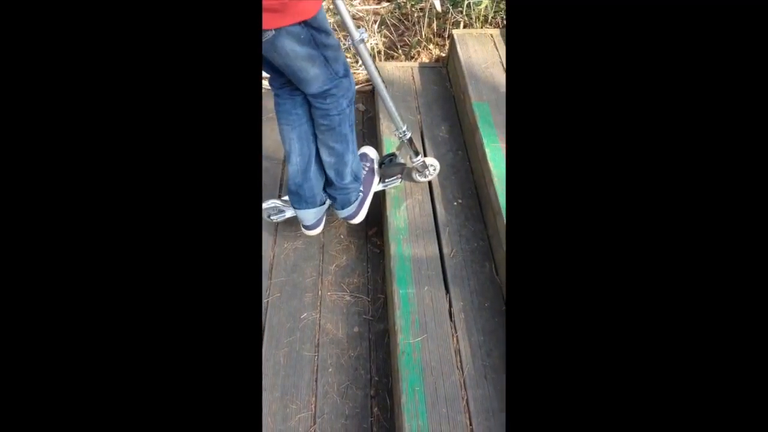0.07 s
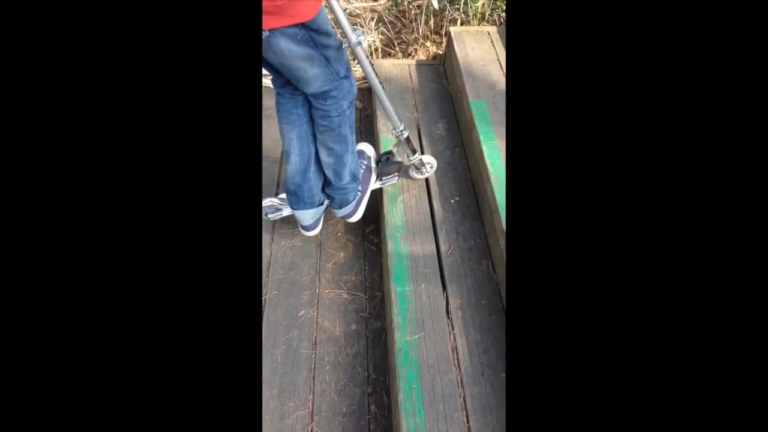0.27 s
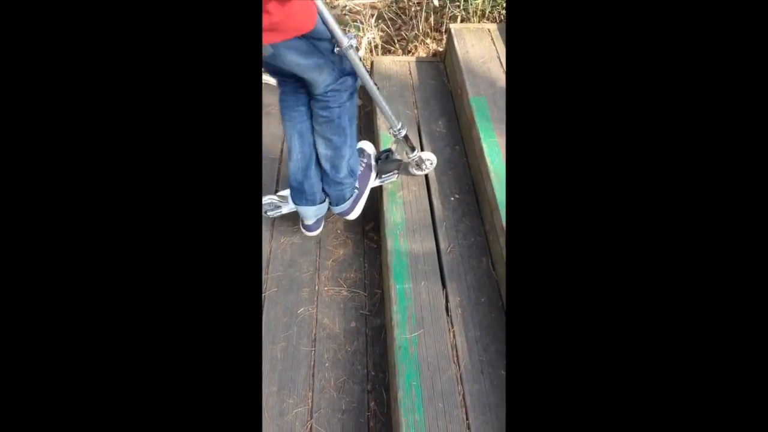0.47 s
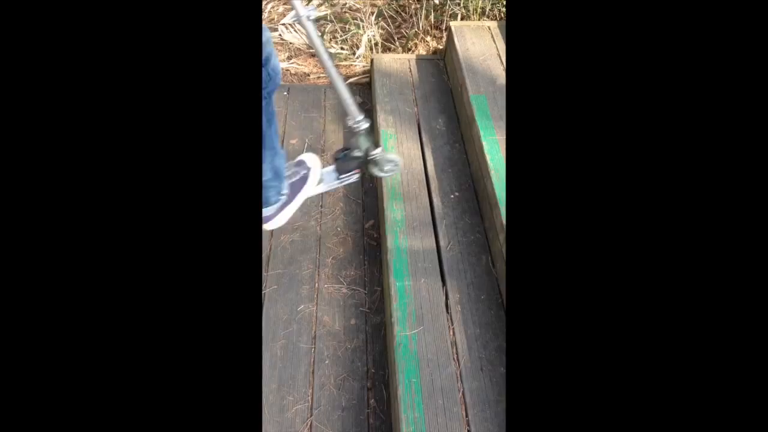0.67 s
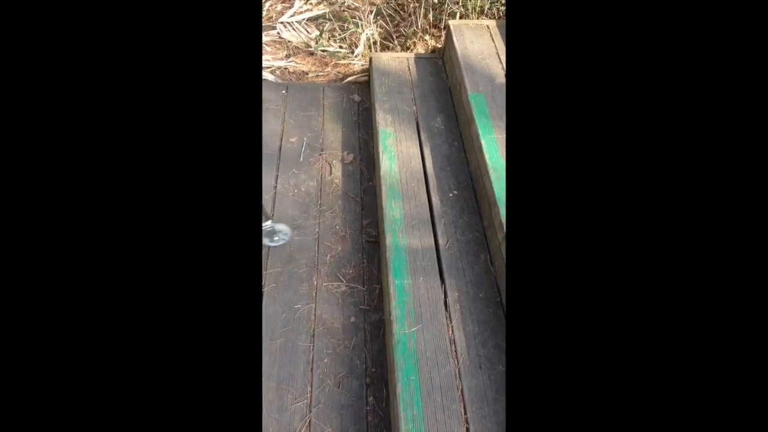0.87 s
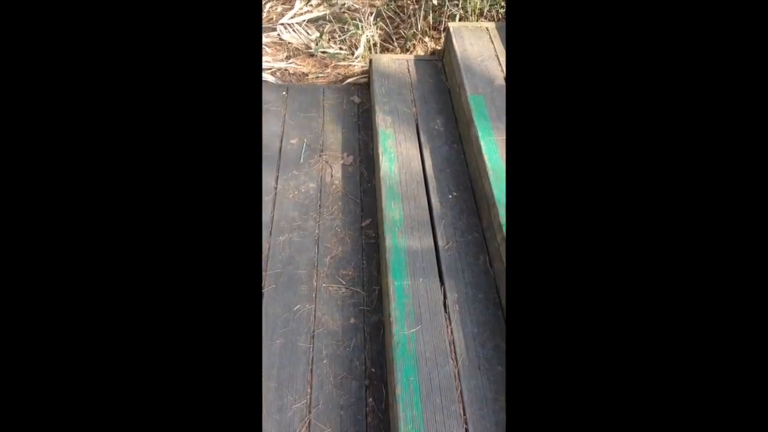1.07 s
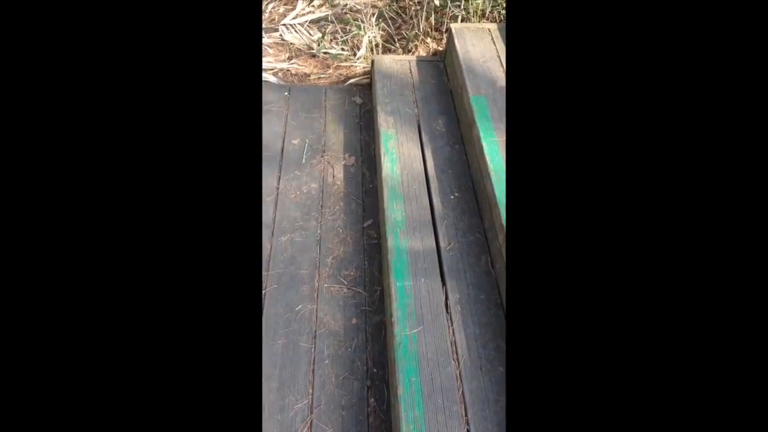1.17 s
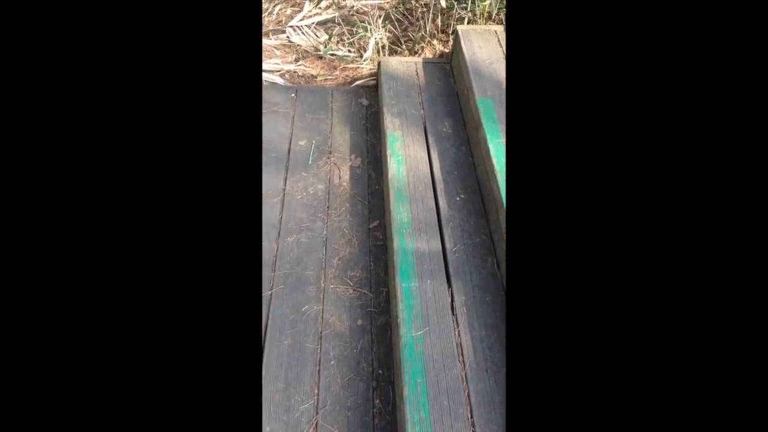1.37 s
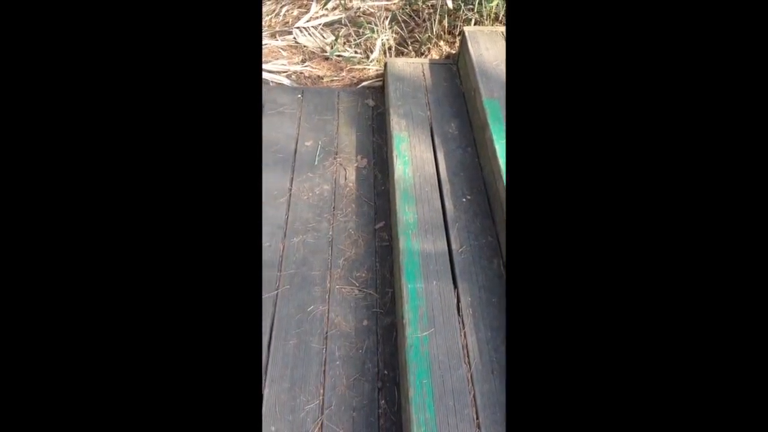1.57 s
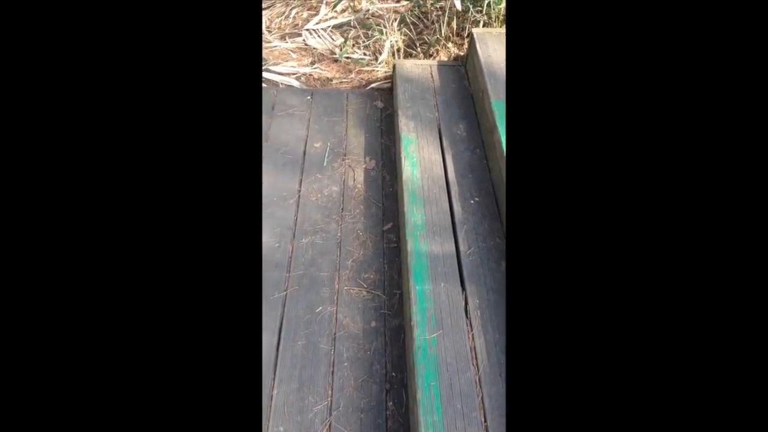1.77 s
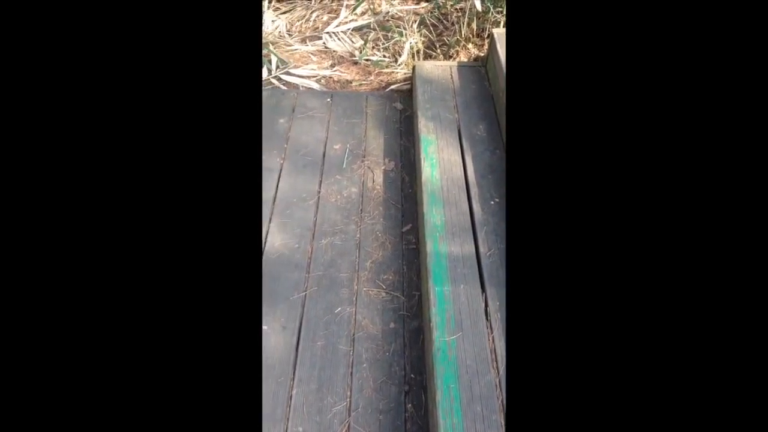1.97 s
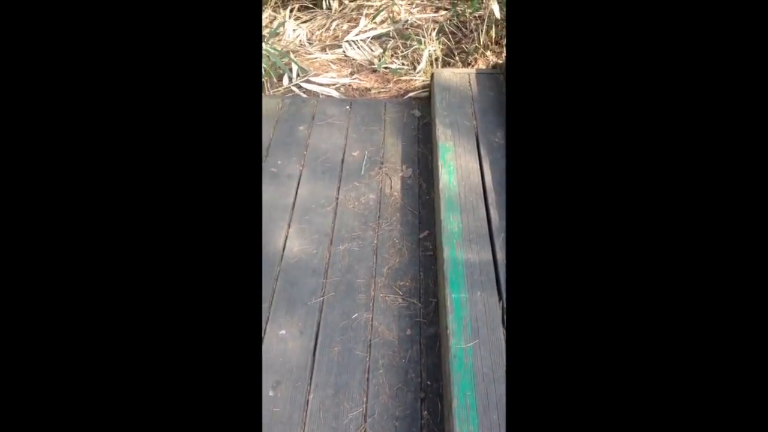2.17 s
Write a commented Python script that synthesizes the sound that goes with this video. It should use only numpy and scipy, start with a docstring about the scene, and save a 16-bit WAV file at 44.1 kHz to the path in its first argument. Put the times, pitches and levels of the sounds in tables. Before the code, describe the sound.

Scooter wheels thud on wooden planks, metal rattles, one hard booming clack, then lighter knocks and clatter.

```python
"""A kick scooter drops down weathered wooden steps outdoors, under a soft open-air hush (shaped noise).
At first the planks thud and rumble (ringing modes); thin bird notes (sine sweeps) call at 0.2-0.3 s.
Metal rattles (noise bursts and ringing modes) at 0.5-0.7 s; the hardest drop booms and clacks at 0.86-0.92 s.
Two more bird notes follow at 1.0-1.4 s amid lighter knocks; a last run of clacks and thuds comes at 2.0-2.2 s.
"""
import sys
import numpy as np
from scipy import signal
from scipy.fft import rfft, irfft
from scipy.io import wavfile

SR = 44100
rng = np.random.default_rng(int(sys.argv[2]) if len(sys.argv) > 2 else 0)


def boost(x):
    """Linear amplitude factor 10**(x/20) for a level x in decibels (scalar or array-like)."""
    u = np.asarray(x, float) / 20
    return 10 ** u


def persist_wave(psi):
    """Save psi, clipped to +-1, as 16-bit WAV."""
    counts = np.round(np.clip(psi, -1, 1) * 32767).astype(np.int16)
    wavfile.write(sys.argv[1], SR, np.atleast_2d(counts).T)


N = 97328

# plank modes: f/Hz, relative level/dB, t60/s
PLANK_MODES = [(138.2, -5.5, 0.05), (155, -2.5, 0.32), (171.8, 1.5, 0.12), (205.5, -9, 0.24),
               (255.5, -4, 0.089), (290, -4.5, 0.091), (324.2, -3.5, 0.063), (365, -13.5, 0.1),
               (411, -7, .07), (558, -8, 0.066), (666, -4.5, 0.041), (820, -9, 0.11), (970, -1, 0.035)]


def rms_one(x):
    """Scale to unit rms."""
    return x / np.sqrt(np.mean(x ** 2) + 1e-20)


def in_time(rows):
    """Join curve points by straight lines."""
    return np.interp(np.arange(N) / SR, *np.transpose(rows))


def ring(clicks, hz, t60_s):
    """Two-pole resonator: a unit click starts a decaying sine of height 1."""
    radius = boost(-60 / (t60_s * SR))
    w = 2 * np.pi * hz / SR
    poles = [1, -2 * radius * np.cos(w), radius ** 2]
    return signal.lfilter([0, np.sin(w)], poles, clicks + 1e-18)


def band(x, hz, octaves):
    edges_hz = hz * 2 ** (np.array([-.5, .5]) * octaves)
    edges_hz = np.clip(edges_hz, 20, [.4 * SR, .45 * SR])
    return signal.sosfilt(signal.butter(2, edges_hz, "band", fs=SR, output="sos"), x)


def hush():
    """Smooth distant noise of leaves and far traffic: white noise, spectrally shaped, slowly swelling."""
    # noise spectrum: f/Hz, relative density/dB
    spectrum = [(24, -71), (40, -22), (87, -4.5), (219, -5.5), (335, -3), (361, -11.5), (475, -5),
                (1030, -8), (1200, -7), (6380, -25.5), (15700, -43)]
    # slow swell: t/s, gain/dB
    swell = [(0, -4.5), (.5, -3.5), (.75, -3), (1.2, -7.5), (1.6, -5.5), (2.21, -4.5)]
    base_db = -53
    hz, db = np.transpose(spectrum)
    f_hz = np.arange(N // 2 + 1) * SR / N + 1   # +1 keeps the log finite
    gain = boost(np.interp(np.log(f_hz), np.log(hz), db))
    noise = irfft(rfft(rng.standard_normal(N)) * gain, N)
    return boost(base_db + in_time(swell)) * rms_one(noise)


def birds():
    """Thin sine sweeps under half-sine envelopes; noise makes the pitch tremble."""
    # notes: t/s, length/s, start f/Hz, end f/Hz, peak level/dB, rms tremble/Hz
    notes = [(0.218, .045, 6300, 7300, -63, 90), (.225, .03, 3700, 4070, -68, 60),
             (.33, 0.081, 5900, 7260, -68, 90), (.335, .03, 6850, 7500, -70, 60),
             (0.339, 0.046, 3460, 4300, -68, 60), (1.048, 0.08, 7500, 6660, -65.5, 350),
             (1.243, 0.12, 7300, 6800, -63, 402)]
    out, t = np.zeros(N), np.arange(N) / SR
    tremble = rms_one(band(rng.standard_normal(N), 150, 2.7))
    for start_s, length_s, start_hz, end_hz, db, tremble_hz in notes:
        progress = np.clip((t - start_s) / length_s, 0, 1)
        pitch_hz = start_hz + (end_hz - start_hz) * progress + tremble_hz * tremble
        tone = np.sin(2 * np.pi * np.cumsum(pitch_hz) / SR)
        out += boost(db) * np.sin(np.pi * progress) * tone
    return out


def outdoors(x):
    """Short, dull, dense scatter from risers, rails and brush: convolution with decaying noise."""
    scatter_db, start_s, t60_s, cut_hz = -11.5, 0.0025, 0.13, 1670
    t = np.arange(SR // 4) / SR
    tail = rng.standard_normal(len(t)) * boost(-60 * t / t60_s) * (t > start_s)
    tail = signal.sosfilt(signal.butter(1, cut_hz, fs=SR, output="sos"), tail)
    tail = tail / np.sqrt(np.sum(tail ** 2))
    return x + boost(scatter_db) * signal.fftconvolve(x, tail)[:N]


def metal():
    """Each knock is a dying burst of chatter in its own band and rings deck and stem modes near its centre."""
    # knocks: t/s, level/dB, centre f/Hz, width/octaves, chatter t60/s, relative ring level/dB
    clacks = [(.001, -39.5, 5700, 2.2, 0.034, -3), (.012, -42, 3300, 2.75, 0.088, -19),
              (.066, -57, 3440, 2.4, 0.066, -15), (0.099, -57, 1980, 1.2, 0.036, 1),
              (.130, -59.5, 6500, 2.2, 0.047, -5), (0.261, -63, 8000, 1.8, .03, -14),
              (0.411, -55, 1000, 1.5, 0.068, -17), (0.417, -50, 5840, 1.1, 0.017, -23),
              (0.527, -50, 1820, 3.4, 0.056, -2), (.534, -59, 5000, 4.5, 0.024, 1),
              (.548, -55.5, 7900, 0.57, 0.043, -5), (0.541, -51, 786, 1.6, 0.38, -15),
              (.565, -47, 1490, 1.15, 0.11, -6), (0.566, -46, 5840, 0.97, 0.058, -1.5),
              (0.585, -46.5, 6500, 1.25, 0.076, -15), (.618, -46, 9000, 6.4, 0.035, -7),
              (.632, -29.5, 3260, 2.55, 0.038, -26), (0.633, -41, 2320, 1.8, 0.13, 5),
              (.636, -38, 980, 1.1, .08, -18), (.656, -43, 2500, 3.1, 0.13, 3),
              (.675, -51.5, 3000, 3.2, 0.062, -9), (0.861, -26.5, 2600, 2.35, 0.12, -8),
              (.873, -12, 4870, 0.87, 0.014, -17.5), (.873, -17.5, 2300, 1.5, .018, -6),
              (.879, -33.5, 2500, 4.5, 0.12, -21), (.894, -22, 1800, 2.5, 0.059, -5),
              (.899, -28.5, 3400, 3.6, 0.083, -16), (.897, -36.5, 7200, 0.52, 0.19, -6),
              (.953, -44.5, 3200, 3.1, 0.054, -6), (0.99, -46.5, 3070, 2.4, 0.032, -7),
              (1.011, -39.5, 4340, 2.2, 0.039, -28), (1.107, -35.5, 8600, 1.3, 0.022, -8),
              (1.118, -50, 7400, 0.58, 0.12, -9), (1.142, -46, 6200, 0.87, 0.029, 2),
              (1.158, -43.5, 1490, 3.3, 0.057, -9), (1.171, -55, 4060, 3, 0.032, -13),
              (1.231, -43.5, 4400, 2.4, 0.017, -15), (1.232, -63, 7440, 0.84, 0.044, 0.5),
              (1.293, -56.5, 3460, 2.1, 0.04, -1), (1.367, -43.5, 1480, 3.2, .03, -9.5),
              (1.368, -56, 2460, 1.4, 0.022, 1.5), (1.41, -48.5, 1500, 1.2, 0.031, -15),
              (1.481, -57.5, 8500, 0.47, 0.026, -9), (1.597, -42.5, 4640, 1.9, 0.051, -2.5),
              (1.601, -51, 2200, 2.3, 0.028, 1.5), (1.994, -22.5, 3000, 1.57, 0.048, -8.5),
              (1.996, -30, 5030, 0.77, 0.079, 9), (1.997, -33.5, 1300, 3.2, 0.075, -4.5),
              (1.998, -47, 6700, 2.7, 0.17, 5), (2.033, -29, 2220, 3.1, 0.069, -6),
              (2.083, -29.5, 1790, 3.1, 0.048, -2.5), (2.088, -42, 3680, 2.8, 0.15, 5.5),
              (2.092, -46.5, 1300, 0.86, 0.071, 1.5), (2.112, -42.5, 7400, 2.3, 0.049, -2),
              (2.129, -34.5, 2080, 3.8, 0.062, -5), (2.140, -43, 2500, 2.56, 0.17, -3),
              (2.190, -53.5, 6900, 0.77, 0.06, -8.5)]
    # deck and stem modes: f/Hz, relative level/dB, t60/s
    frame_modes = [(1300, 5.5, 0.031), (1790, 10, 0.022), (2177, 11.5, 0.02), (2500, 3, 0.029),
                   (3000, 16, 0.015), (3500, -5.5, 0.028), (3720, -1, 0.045), (5030, -5.5, .025),
                   (6260, 14.5, 0.014), (6500, -1, 0.026), (6800, 4, 0.047), (7400, 3, 0.046),
                   (8000, -5, .03), (9300, -23, .03)]
    chatter_attack_s, spike_db, rattle_db = 0.00093, 1.5, 2.5
    ring_attack_s, ring_gain_db, ring_scatter_db, ring_roughness = 0.0012, 2.5, 0.5, 0.54
    focus_octaves, far_modes_share = 0.16, 0.094

    t = np.arange(SR // 5) / SR
    out = np.zeros(N + len(t))
    noises = rng.standard_normal((len(clacks), len(t)))
    touch_sizes = rng.exponential(1, (len(clacks), len(t)))
    scatter_db = rng.standard_normal((len(clacks), len(frame_modes))) * ring_scatter_db

    mode_hz, mode_db, mode_t60_s = np.transpose(frame_modes)[:, :, None]
    mode_envelope = (1 - np.exp(-t / ring_attack_s)) ** 2 * boost(mode_db - 60 * t / mode_t60_s)
    modes = mode_envelope * np.sin(2 * np.pi * mode_hz * t)

    for row, noise, sizes, odd_db in zip(clacks, noises, touch_sizes, scatter_db):
        start_s, db, hz, octaves, t60_s, ring_db = row
        envelope = (1 - np.exp(-t / chatter_attack_s)) * boost(-60 * t / t60_s)
        # later touches come in clumps
        clumps = np.minimum(t / 0.004, 1) * rms_one(band(sizes - 1, 260, 3.03))
        spikes = boost(spike_db * np.minimum(sizes, 5))
        rough_noise = noise * boost(rattle_db * clumps) * spikes
        chatter = envelope * rms_one(band(rough_noise, hz, octaves))

        distance_octaves = np.log2(mode_hz[:, 0] / hz)
        nearness = far_modes_share + np.exp(-.5 * (distance_octaves / focus_octaves) ** 2)
        mode_gain = nearness * boost(ring_db + odd_db)
        # loose parts damp the ring unevenly
        wobble = 1 + ring_roughness * rms_one(band(noise, 156, 1.8))
        ringing = boost(ring_gain_db) * wobble * (mode_gain @ modes)
        i = int(start_s * SR)
        out[i:i + len(t)] += boost(db) * (chatter + ringing)
    return out[:N]


def plank_rumble():
    """Rolling and shifting weight: small random bumps ring the plank modes, the low ones favoured."""
    # rumble: t/s, level/dB
    roll = [(0, -23), (.09, -38.5), (.2, -54), (.3, -59), (.5, -72), (.55, -49.5), (.7, -50), (.83, -59),
            (.93, -23.5), (1.05, -42), (1.2, -54), (1.33, -52), (1.45, -48), (1.6, -58), (1.7, -80),
            (1.98, -62), (2.02, -39.5), (2.15, -48), (2.21, -54)]
    bumps_per_s, tilt_db_per_octave = 150, -3.5
    bumps = rng.standard_normal(N) * (rng.random(N) < bumps_per_s / SR)
    bumps = signal.lfilter([1], [1, -.85], bumps)
    rumble = np.zeros(N)
    for k, (hz, db, t60_s) in enumerate(PLANK_MODES):
        shifted = np.roll(bumps, 97 * k * k)   # each mode gets its own timing
        gain = boost(db + tilt_db_per_octave * np.log2(hz / 200))
        rumble += gain * ring(shifted, hz, t60_s)
    return boost(in_time(roll)) * rms_one(rumble)


def plank_thuds():
    """Wheels strike the planks: soft pushes ring the modes, most strongly near each blow's pitch."""
    # blows: t/s, relative level/dB, favoured f/Hz, fall-off one octave away/dB, contact length/s
    thuds = [(.001, -22.5, 175, 8, .002), (.030, -30, 202, 2, 0.0016), (.058, -29, 180, 6, 0.0017),
             (.075, -35.5, 160, 14, 0.003), (.531, -47, 300, -6, 0.0015), (.632, -34, 200, 3, 0.0009),
             (.859, -3.5, 299, 14, 0.0019), (.868, -8, 275, 8, 0.0038), (.893, -6.5, 196, 1.5, 0.00047),
             (.920, -15.5, 290, 4, 0.00088), (1.000, -32.5, 282, 14, 0.00059), (1.012, -37, 174, 0, 0.0019),
             (1.065, -32, 165, 16, 0.0016), (1.149, -31.5, 172, 11, 0.00047), (1.364, -38, 207, 14, 0.0011),
             (1.408, -42, 270, -1, 0.00078), (1.995, -34, 197, 15, 0.00052), (2.034, -43, 200, 3, 0.00077),
             (2.084, -32, 199, 10, .001), (2.112, -30, 165, 9, 0.0023), (2.125, -37.5, 170, 12, .002)]
    t = np.arange(SR // 100) / SR
    out = np.zeros(N)
    for hz, mode_db, t60_s in PLANK_MODES:
        force = np.zeros(N + len(t))
        for start_s, db, best_hz, fall_db, contact_s in thuds:
            push = np.sin(np.pi * np.minimum(t / contact_s, 1)) ** 2
            push_db = db + mode_db - fall_db * np.log2(hz / best_hz) ** 2
            i = int(start_s * SR)
            force[i:i + len(t)] -= push / push.sum() * boost(push_db)
        out += ring(force[:N], hz, t60_s)
    return out / 2


def planks():
    """Thuds and rumble; narrow boards radiate little bass, but a faint deep jolt leaks through."""
    low_hz, deep_leak_db = 136.3, -23
    motion = plank_thuds() + plank_rumble()
    radiated = signal.sosfilt(signal.butter(4, low_hz, "high", fs=SR, output="sos"), motion)
    return radiated + boost(deep_leak_db) * motion


def scene():
    """Hush, birds, scattered metal and planks, in one channel."""
    return (hush() + birds() + outdoors(metal()) + planks())[None]


def low_pass(x):
    """Removes everything above the highest recorded frequency."""
    return signal.sosfilt(signal.butter(12, 15840, fs=SR, output="sos"), x)


def record(dry):
    """A small microphone: thin bass, cut top."""
    low_hz, stop_hz = 49, 16100
    mix = signal.sosfilt(signal.butter(2, low_hz, "high", fs=SR, output="sos"), dry)
    mix = signal.sosfilt(signal.cheby2(12, 60, stop_hz, fs=SR, output="sos"), mix)
    return low_pass(mix)


dry = scene()
out = record(dry)
persist_wave(out)
```